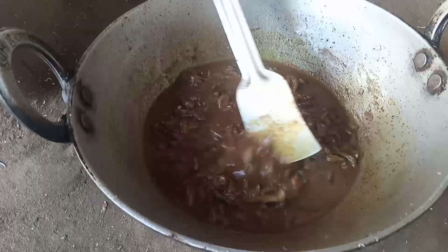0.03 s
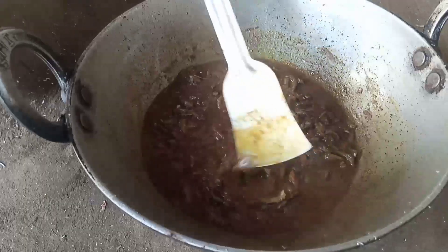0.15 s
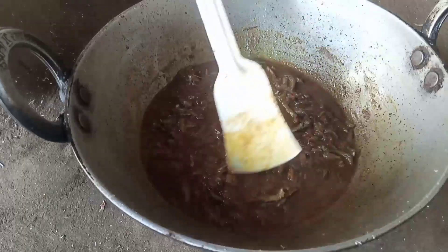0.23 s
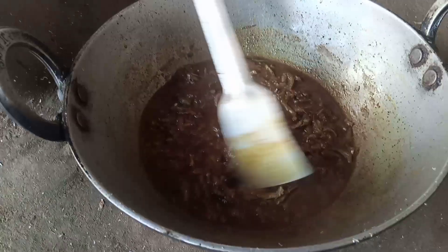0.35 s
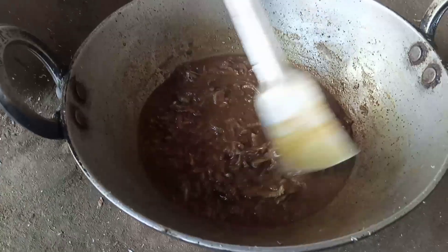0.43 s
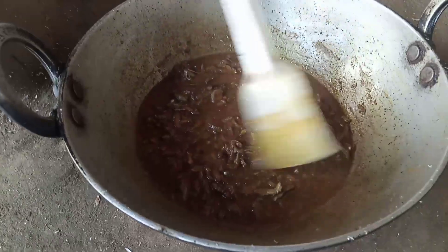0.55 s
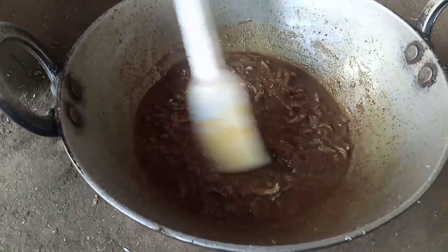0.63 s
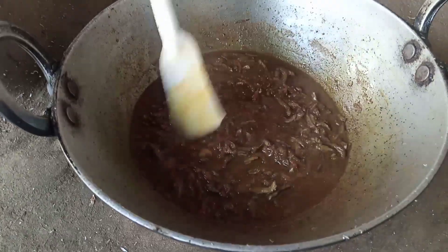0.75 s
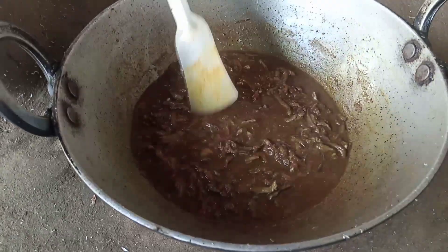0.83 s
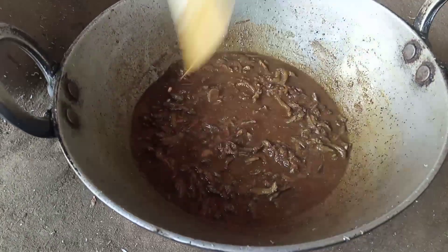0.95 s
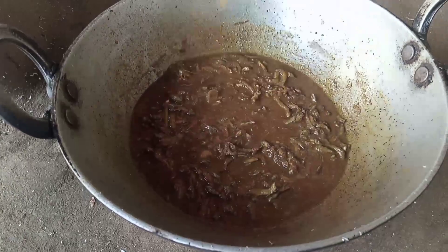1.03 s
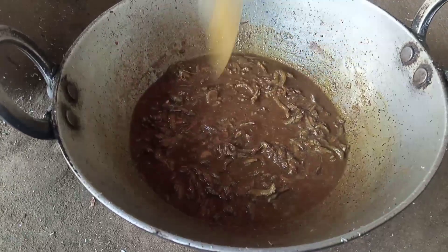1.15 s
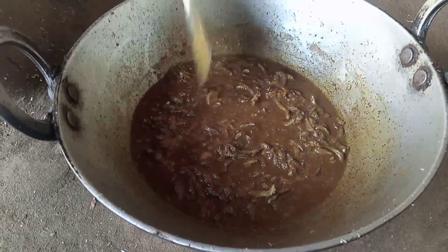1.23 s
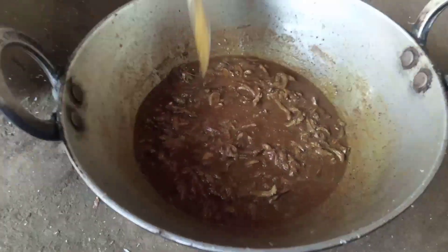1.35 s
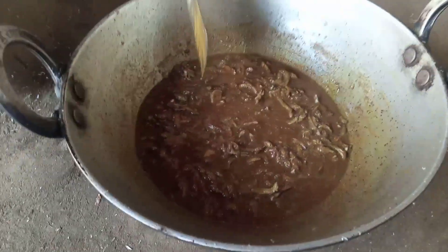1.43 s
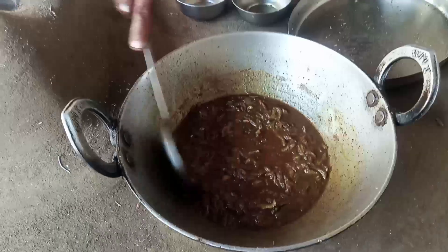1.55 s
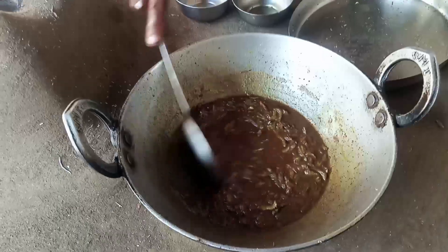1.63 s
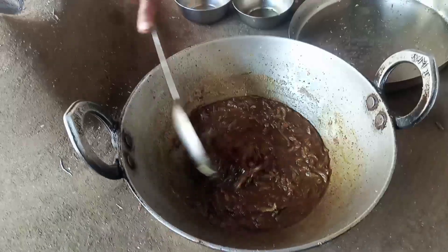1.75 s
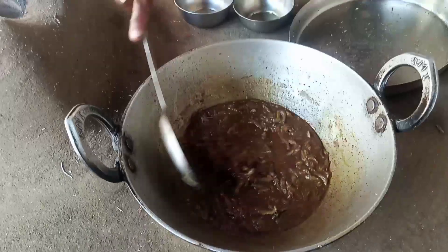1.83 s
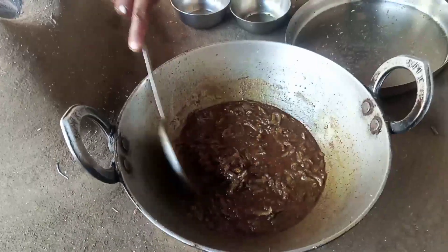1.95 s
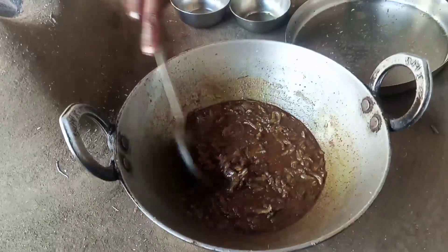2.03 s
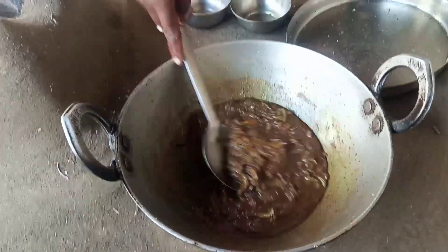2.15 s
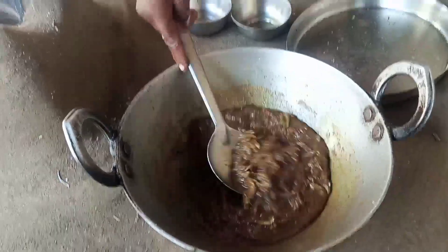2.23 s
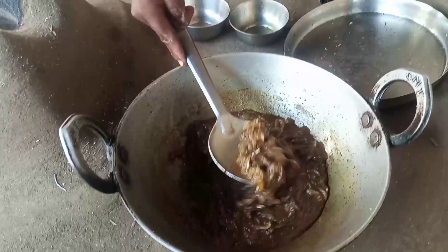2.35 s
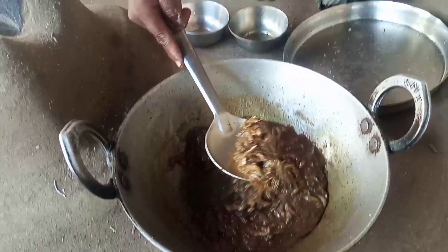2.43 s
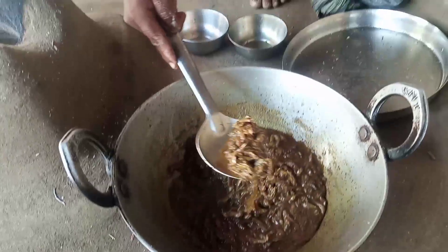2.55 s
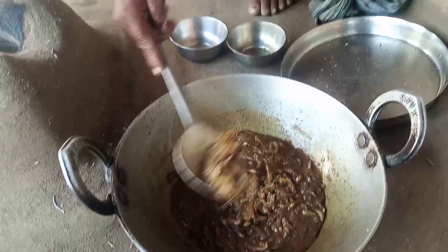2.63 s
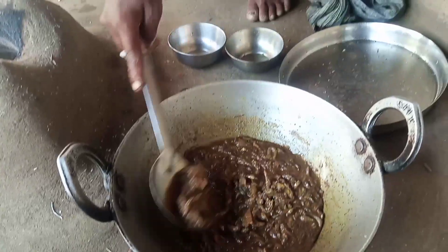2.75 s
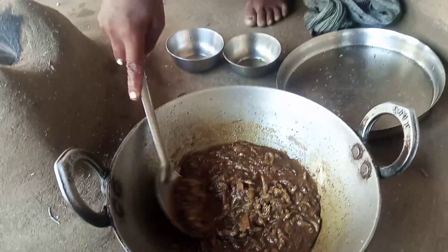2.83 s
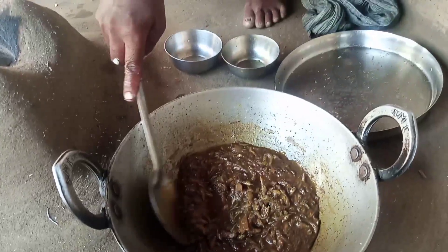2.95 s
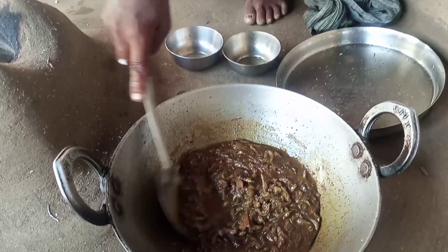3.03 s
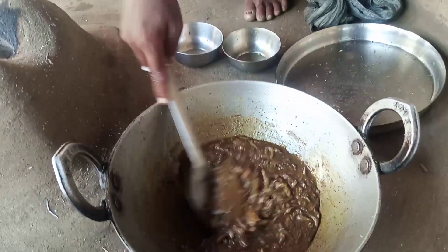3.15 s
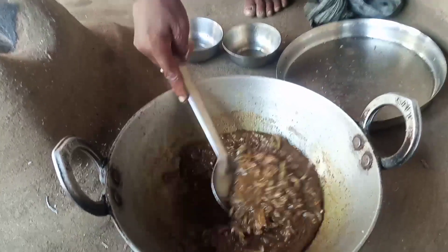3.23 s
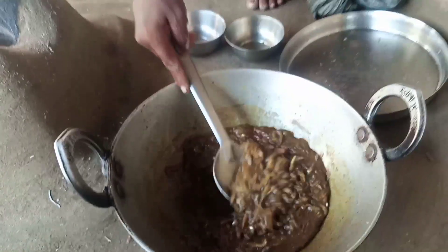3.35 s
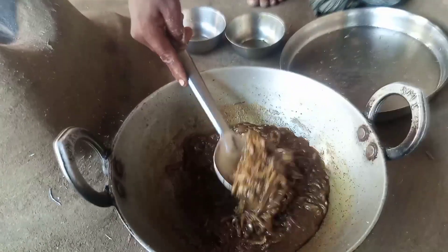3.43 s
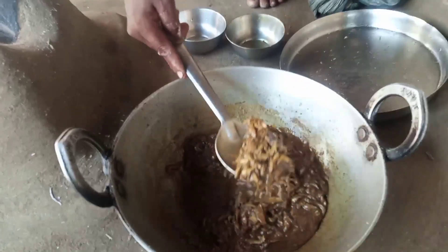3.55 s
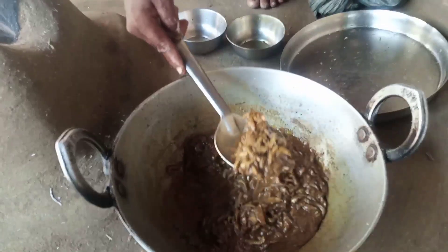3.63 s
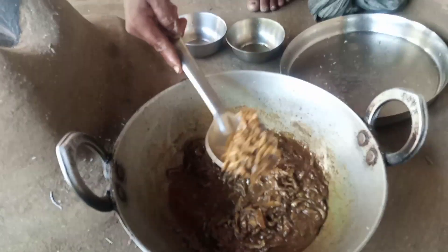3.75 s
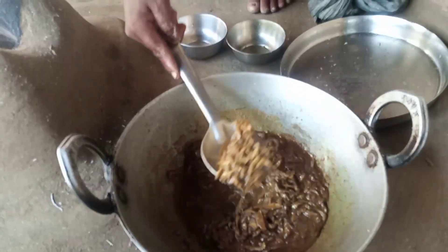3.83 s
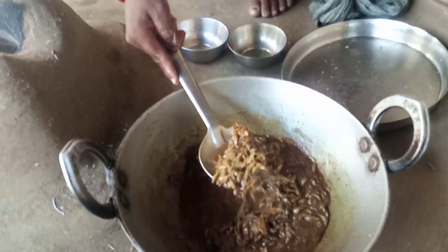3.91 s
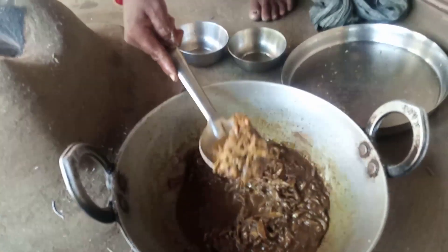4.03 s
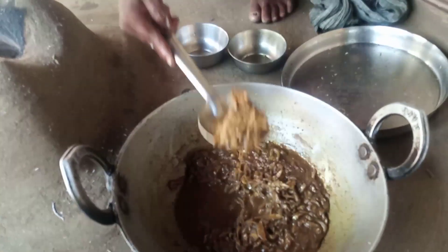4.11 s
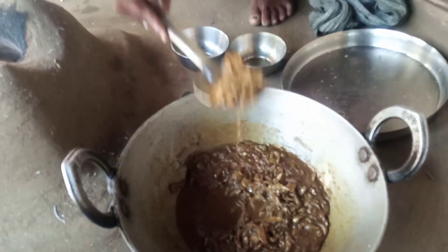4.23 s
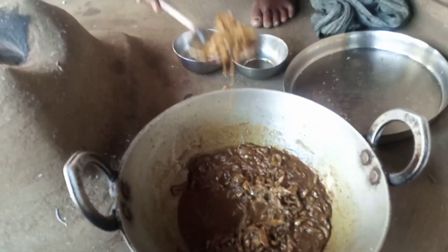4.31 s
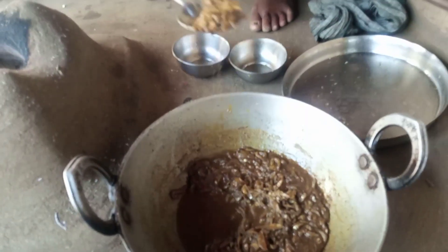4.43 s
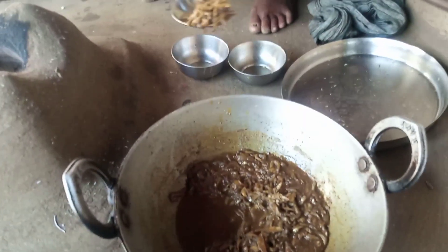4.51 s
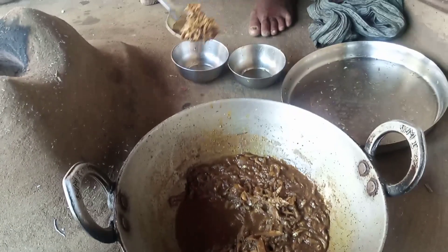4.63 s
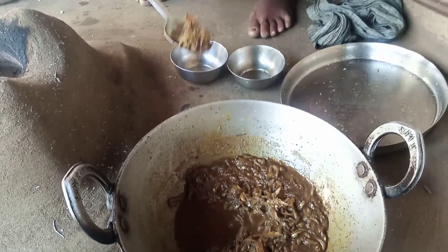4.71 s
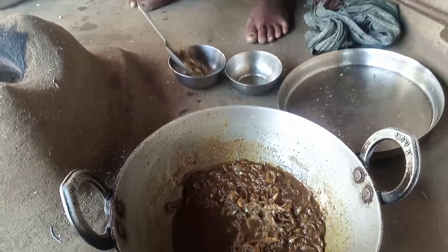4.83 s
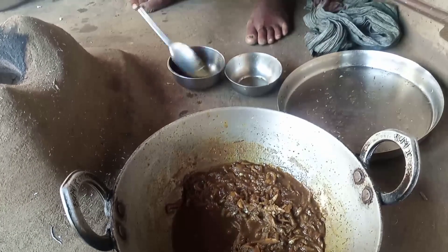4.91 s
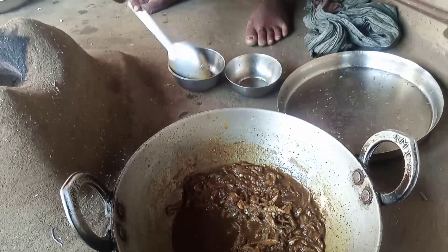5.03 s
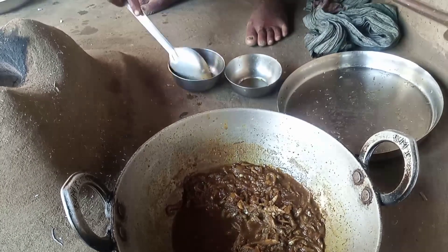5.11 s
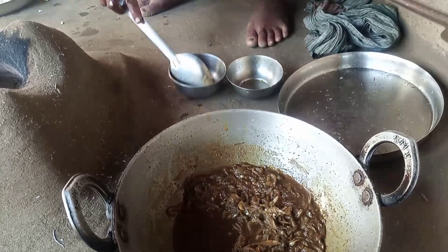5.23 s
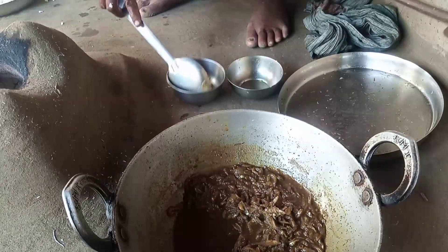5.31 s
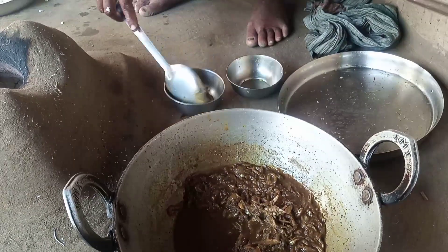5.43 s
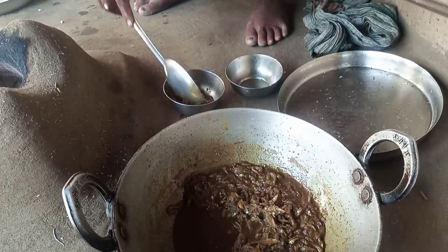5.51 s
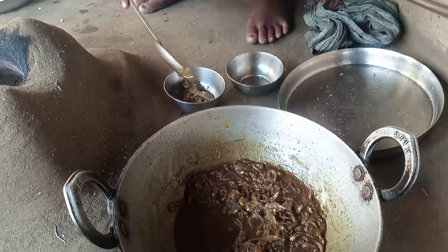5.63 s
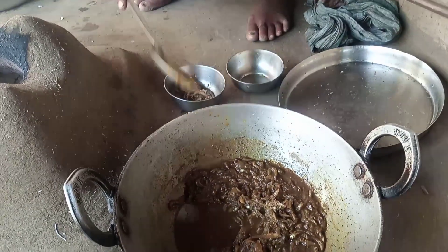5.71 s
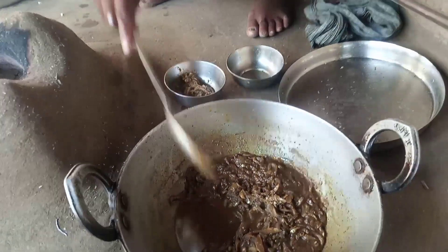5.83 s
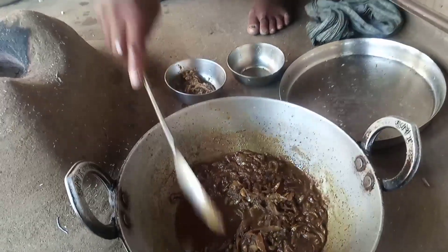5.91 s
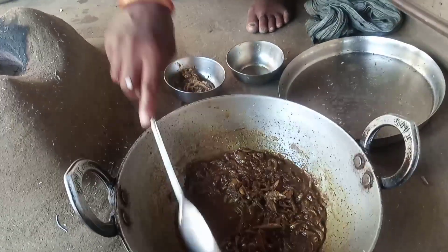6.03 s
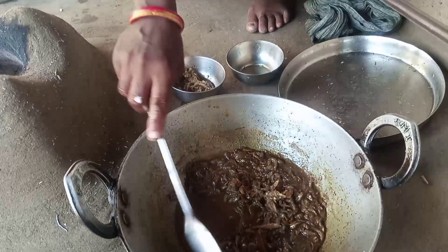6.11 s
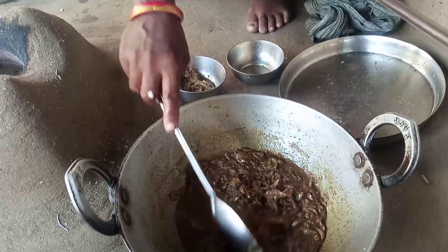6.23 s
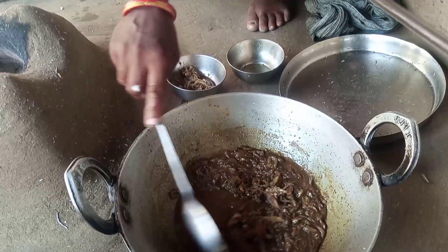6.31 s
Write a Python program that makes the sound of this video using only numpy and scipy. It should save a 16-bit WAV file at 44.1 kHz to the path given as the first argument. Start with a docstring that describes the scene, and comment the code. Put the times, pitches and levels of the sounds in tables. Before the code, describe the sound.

After a quiet insect buzz and a brief silence, hard clanks ring from a thick-walled pan, followed by spoon clinks, scrapes and a squeak in a bowl.

```python
"""A steel spoon knocks and scrapes an aluminium pan of thick food, then clinks in a small steel bowl, a step from a phone.
Blows ring banks of decaying modes under a noisy contact crack; scrapes are dense random slips heard through the modes.
Sparrows chirp as gliding sines, a far bird holds one note, and cloth rustles over a low rumble.
Two shots are joined by a short silence: insects, a noise band with wavering tones, buzz only in the first;
a spotty, noise-suppressed hiss lies under the second."""
import sys
import numpy as np
from scipy import signal
from scipy.fft import rfft, irfft
from scipy.io import wavfile
from scipy.ndimage import uniform_filter1d

SR = 44100
rng = np.random.default_rng(int(sys.argv[2]) if len(sys.argv) > 2 else 0)


def int16_out(signal):
    """Quantize to a 16-bit WAV file."""
    q = np.round(np.clip(np.atleast_2d(signal).T, -1, 1) * 32767)
    wavfile.write(sys.argv[1], SR, q.astype(np.int16))


def boost(x):
    """Linear amplitude factor 10**(x/20) for a level x in decibels (scalar or array-like)."""
    u = np.asarray(x, float) / 20
    return 10 ** u


N = 280917
TIME = np.arange(N) / SR

# silence between the two shots: start_s, end_s
GAP_S = (1.49, 1.637)
# pan wall modes: pitch_hz, width_hz (before any damping floor), level_db (per width)
PAN_MODES = [(605, 9.2, -16.5), (752.5, 100, -15), (1145, 16, -10), (1338, 86, -7), (1545, 20, -5.5),
             (1726, 180, -5.5), (2056, 63, -11.5), (2540, 250, -9), (3050, 160, -10), (3307, 270, -22.5),
             (4080, 17, -20.5), (4770, 74, -17.5), (4770, 66, -2.5), (5235, 100, -4.5), (6070, 230, -4.5),
             (6490, 90, 2), (7080, 220, -1), (7400, 200, -1), (8580, 73, -20), (9060, 210, -7.5),
             (9600, 340, -8), (10050, 130, -18), (11100, 260, -25), (11700, 540, -17), (13400, 160, -32),
             (15000, 110, -32.5), (15600, 95, -28), (15300, 290, -14.5)]
# steel bowl modes, then spoon blade modes: pitch_hz, level_db, t60_s
BOWL_MODES = [(1436, -10.5, 0.45), (1467, -13, 0.4), (2280, -19.5, 0.53), (3180, -28.5, .12),
              (4190, -13, 0.28), (5373, -16, .25), (6480, -10.5, 0.13), (7600, -17, .14), (7975, -27, .3),
              (8560, -26, 0.15), (9270, -16, .17), (9880, -0.5, 0.087), (9600, -8.5, 0.11),
              (10540, -4.5, .07), (10410, -4.5, .08), (11330, -3.5, .1), (13800, -14.5, 0.054),
              (14500, -17, .08), (15600, 3.5, .07), (15350, -7.5, .08)]
SPOON_MODES = [(2272, -43.5, 0.47), (3025, -18.5, 0.24), (4544, -13.5, 0.13), (5663, -6, 0.285),
               (6440, -9, 0.14), (7386, -5.5, 0.14), (6760, -11.5, 0.14), (7696, 2.3, 0.16),
               (8430, -14.5, 0.29), (9286, -27.5, 0.25), (9540, -5.5, 0.097), (9770, -15, 0.32),
               (9900, -1, 0.078), (9700, -9.5, 0.13), (10800, -22, 0.27), (11480, -2, 0.14),
               (13320, -25.5, 0.12), (13800, -21.5, 0.12), (14610, -6.5, 0.09), (15340, 0, 0.076)]
# noise spectrum of bare metal contact: pitch_hz, density_db (per Hz, before each blow's tilt)
CRACK_SPECTRUM = [(180, -46), (300, -18.5), (504, -32.5), (848, -9), (3650, -8), (4100, -4.5), (6340, -3),
                  (7760, -6), (13000, -15.5), (14900, -11.5), (16500, -11.5)]
# blows on pan, bowl and spoon: start_s, level_db, brightness_db (per octave), crack_db (relative share)
PAN_BLOWS = [(0.019, -42, 8.5, 8.5), (0.068, -47.5, 5, -16), (0.454, -49.5, -1, -23),
             (1.308, -38.5, -7.5, 2.5), (1.681, -36.5, 8, -16), (2.088, -10.5, -4.5, 12), (2.135, -9, 2, 0),
             (2.138, -15.5, -6, 13), (2.148, -20.5, -1.1, -3), (2.156, -11.5, 1.5, -2), (2.172, -35, -9, 7),
             (2.175, -21, -1, 10), (2.181, -24, -3.5, 1.6), (2.211, -27, -4, 0.5), (2.633, -40, -15, -11),
             (2.916, -13, -1.5, 8.5), (3.144, -36.5, 6.5, -4.5), (3.166, -43, 3, 7), (3.176, -19.5, 5, 1.5),
             (3.191, -32.5, -6, 8), (3.209, -10.5, 14, -13.5), (3.227, -20, 3.5, 12.5), (3.24, -33, 9, 3),
             (3.252, -24, 2.1, 14), (3.271, -46, -7.5, -3.5), (3.291, -36, 0, 10.5), (3.311, -42, 5, 7.5),
             (3.369, -27, -6, 1.5), (4.044, -56.5, 15, -3), (4.061, -41.5, 4.5, 10.5), (4.092, -58, -4, 12),
             (5.614, -45, -7.5, -10), (5.8, -37, 5, 9), (5.99, -50, -7, -17), (6.173, -29.5, -8, -11),
             (6.177, -30, -11, -10), (6.261, -48, 3, -8)]
BOWL_BLOWS = [(4.956, -12.5, -1, 7), (5.019, -15.5, 0, 7), (5.088, -46.5, -3.5, 13),
              (5.235, -26.5, -1, 3.5), (5.311, -30, 0.5, -17)]
SPOON_BLOWS = [(5.134, -10.5, 0, -6), (5.147, -15, 0, -0.7), (5.162, -13, 0, -7.5), (5.461, -33.5, 0, -10)]
# strokes on pan, food, bowl and cloth: firmest_s, rise_s, fall_s, level_db, brightness_db (per octave)
PAN_SCRAPES = [(2.139, 0.005, 0.033, -29, 1.5), (2.157, 0.013, 0.013, -28.5, -0.5),
               (2.18, .01, 0.033, -34, -2), (2.225, 0.071, 0.033, -40, 1), (2.27, .03, 0.085, -77.5, -1),
               (3.19, 0.052, .03, -57, 7), (3.222, 0.022, 0.035, -38.5, 2), (3.27, 0.027, .04, -48, -4),
               (3.31, 0.024, 0.045, -60.5, 1), (6.195, .025, 0.028, -59, 3.5),
               (6.212, 0.018, 0.011, -60, 6), (6.225, .015, 0.036, -64, 4), (6.28, 0.041, 0.13, -66.5, -1)]
FOOD_STIRS = [(.59, .03, .06, -64, 3), (.69, .02, 0.042, -71, 1.5), (1.664, 0.024, 0.055, -65.5, 1.5),
              (2.39, .02, 0.049, -83, 5.5), (2.46, 0.048, 0.077, -61.5, -9), (2.52, 0.1, 0.11, -60, -16),
              (2.635, 0.026, 0.051, -68.5, -20), (2.86, 0.019, 0.09, -70.5, -9)]
BOWL_SCRAPES = [(5.137, 0.0032, 0.055, -41, 6), (5.2, 0.032, 0.067, -54, -7),
                (5.255, 0.038, 0.051, -48.5, -1), (5.311, .02, 0.074, -50, 0.5), (5.4, .06, .06, -68, 6),
                (5.47, 0.026, 0.054, -57, 3.5), (5.51, 0.082, 0.092, -52.5, 3.5),
                (5.62, 0.043, 0.093, -61.5, -8.5), (5.805, 0.041, 0.058, -56.5, -1)]
CLOTH_RUSTLES = [(0.03, 0.039, .06, -81, 8.5), (0.075, .012, 0.094, -83, 6.5),
                 (1.13, 0.047, 0.13, -75, 5.5), (1.316, 0.016, 0.019, -70.5, -12),
                 (1.47, 0.21, 0.19, -57, 5.5), (4.29, .02, 0.07, -69.5, -15), (4.355, 0.031, 0.15, -64, -3),
                 (4.6, 0.16, 0.35, -77, -1), (4.85, 0.25, 0.15, -72.5, 1), (4.94, 0.047, 0.043, -71, 0.5),
                 (5.04, .004, 0.022, -52.5, 3), (5.114, 0.0483, 0.026, -59, -1),
                 (5.95, 0.14, 0.14, -77.5, 1.5), (6.05, 0.088, 0.065, -77, -1.5),
                 (6.16, 0.062, 0.032, -74, 2)]
# colour of each rubbing against its middle band: body_db, edge_db, treble_db
PAN_GRAIN_DB = (-5, -2.5, -13.5)
FOOD_GRAIN_DB = (-16.5, -6.5, -8)
BOWL_GRAIN_DB = (-14, -0.5, 1.5)
CLOTH_GRAIN_DB = (-7.5, -3.5, -6)
# hollow resonances of the pan and bowl, which colour the rustle: pitch_hz, level_db, t60_s
HOLLOW_MODES = [(544, 13, 0.13), (821, -4, 0.5), (1116, -6.5, 0.13), (1329, 6, 0.062), (1974, 1, 0.018)]
# wet food ticking on the blade: peak_s, level_db, pitch_hz
FOOD_TICKS = [(2.361, -69.5, 7180), (2.3924, -69.5, 9450), (2.4325, -56, 9500), (2.4718, -62, 9220),
              (2.531, -60, 8200), (2.8696, -78, 6820), (3.5242, -59.5, 7680), (3.6177, -57, 11100),
              (3.636, -65.5, 6850), (3.918, -65.5, 10170), (4.2043, -56, 9780), (4.344, -56.5, 8900),
              (4.47, -63, 10380), (4.497, -65.5, 10400), (4.537, -63.5, 8340), (6.33, -58.5, 8520)]
# throbs of the blade squeaking on the rim: peak_s, level_db, stick_slip_hz
SQUEAK_THROBS = [(5.235, -40.5, 962), (5.245, -38, 920), (5.253, -37, 928), (5.263, -41, 948),
                 (5.269, -47, 890), (5.318, -50.5, 926)]
# squeak harmonics from the fundamental up: level_db
SQUEAK_HARMONICS_DB = [-40, 3.5, -11, -1.5, 0.5, -6, -7.5]
# sparrow notes, before waver and roughness: start_s, length_s, from_hz, to_hz, level_db (before a common lift)
CHIRPS = [(.27, .06, 4970, 4960, -85), (0.881, 0.036, 3350, 2680, -76), (1.192, 0.053, 3240, 2520, -71.5),
          (1.722, 0.072, 5030, 3200, -63), (1.786, 0.066, 3630, 2445, -47), (1.756, 0.099, 5200, 4660, -60),
          (1.848, 0.029, 4700, 3320, -65), (1.842, 0.045, 3600, 2960, -54), (1.755, 0.068, 4800, 4100, -67),
          (2.419, 0.061, 5240, 4820, -62.5), (2.472, 0.073, 5350, 3695, -65),
          (2.48, 0.047, 4840, 3500, -60.5), (2.495, 0.039, 3440, 2564, -57),
          (3.35, 0.06, 4730, 3860, -63.5), (3.401, 0.066, 3347, 2870, -61), (3.428, 0.038, 4700, 4260, -69),
          (3.646, 0.079, 4806, 3690, -64.5), (3.704, 0.03, 3304, 2920, -74.5),
          (3.741, 0.049, 3246, 2635, -56), (3.784, 0.12, 5200, 4580, -64.5),
          (3.876, 0.037, 4640, 4220, -69), (3.905, 0.035, 3620, 3100, -57.5),
          (4.115, 0.034, 2380, 3310, -60), (4.125, 0.04, 4190, 4580, -66), (4.165, 0.021, 3010, 2860, -71),
          (4.17, 0.048, 5480, 5360, -73.5), (4.21, 0.098, 4860, 4355, -61),
          (4.307, 0.025, 3520, 2980, -57.5), (4.387, 0.018, 3050, 2800, -54),
          (4.742, 0.023, 3246, 2890, -59.5), (4.82, 0.14, 5510, 4350, -70),
          (5.629, 0.042, 3654, 2940, -56.5), (5.683, 0.075, 4290, 2680, -64.5),
          (5.855, 0.074, 4980, 3870, -66), (5.924, 0.035, 3100, 2870, -65.5)]
# swells of the far held note: peak_s, rise_s, fall_s, level_db
HELD_NOTE = [(1.88, 0.049, 0.21, -56.5), (2.06, .1, 0.044, -65.5), (2.35, .15, 0.16, -80),
             (3.31, .1, .1, -53), (3.46, .12, 0.053, -55.5), (3.62, .15, .15, -81),
             (4.63, 0.21, 0.074, -71), (4.76, .07, .13, -72), (5.93, 0.42, .35, -70)]
HELD_NOTE_HZ = 1362.
# one swell of a low hum: peak_s, rise_s, fall_s, level_db
HUM_SWELL = [(2.72, 0.059, 0.15, -58)]
HUM_HZ = 178.2
# insect chorus spectrum: pitch_hz, density_db (per Hz); and its level_db before trim
INSECT_BAND = [(3240, -32), (5500, -35), (6030, -17), (6300, -26), (6830, 0.5), (8100, -2), (8390, 2.5),
               (8930, -2), (9100, -5.5), (10500, -21.5), (13600, -62), (22000, -120)]
INSECT_BAND_DB = -62
# single insects: pitch_hz (before waver), level_db (before a common lift)
INSECT_TONES = [(6234, -88), (6880, -94.5), (7025, -77.5), (7450, -85), (7655, -78.5), (8662, -69)]
# steady faint floor of the first shot: pitch_hz, density_db (per Hz); and its level_db
STEADY_FLOOR = [(15, -36), (25, 13.5), (49, -10), (118, -10), (669, -22.5), (5570, -27.5), (6920, -19.5),
                (8370, -7), (10400, -30.5), (15200, -28), (16500, -63)]
STEADY_FLOOR_DB = -72.5
# noise-suppressed hiss of the second shot, before it turns spotty: pitch_hz, density_db (per Hz); and its level_db
SPOTTY_HISS = [(350, -29.5), (500, 0.5), (620, -11), (1100, -17.5), (1410, -6.5), (3400, -22.5),
               (4620, -15.5), (6660, -24), (9500, -21.5), (13000, -29.5), (14300, -22), (15400, -13.5),
               (16500, -31)]
SPOTTY_HISS_DB = -77.5
# low rumble of street and hand: pitch_hz, density_db (per Hz)
RUMBLE_SPECTRUM = [(12, -61), (20, -34), (27, -37), (64, 0), (170, -5), (216, -2), (416, -7.5), (497, -5.5),
                   (700, -42.5), (910, -50.5), (1540, -120)]
# mean rumble level: before_gap_db, after_gap_db
RUMBLE_DB = (-94.5, -73.5)
# the hand shifts on the phone and the pan rocks on the ground: peak_s, rise_s, fall_s, level_db
BUMPS = [(.29, 0.13, 0.4, -87.5), (.99, 0.054, 0.092, -82), (1.116, .04, 0.14, -73),
         (1.31, 0.037, 0.13, -63.5), (1.48, 0.28, .05, -66), (2.1, 0.037, 0.038, -53.5),
         (2.2, .08, 0.085, -57), (2.68, .1, 0.18, -66), (2.93, 0.027, 0.052, -65.5),
         (4.37, 0.092, 0.13, -66), (5.1, 0.62, 0.31, -62.5), (5.45, 0.086, 0.12, -68),
         (5.62, 0.037, 0.066, -50), (5.803, 0.032, 0.057, -47), (6.0, 0.086, 0.048, -59),
         (6.178, 0.0073, 0.13, -54.5)]
# microphone colour: pitch_hz, gain_db
MICROPHONE = [(250, -1.6), (400, -6.5), (750, 0), (6400, -1.5), (10500, 0.9), (13000, -7), (15000, 1)]
# upper edge of the microphone's range
TOP_HZ = 15750


def unit(x):
    """Scale to rms 1."""
    return x / np.sqrt(np.mean(x ** 2))


def noise():
    """White noise as long as the scene."""
    return rng.standard_normal(N)


def colour(x, points):
    """Shape the spectrum by (Hz, dB) points, joined along log frequency."""
    hz, db = np.transpose(points)
    f = np.maximum(np.arange(len(x) // 2 + 1) * SR / len(x), 1)
    gain = boost(np.interp(np.log(f), np.log(hz), db))
    return irfft(rfft(x) * gain, len(x))


def walk(rate):
    """Random levels held 1 / rate s and smoothed twice."""
    hold = int(SR / rate)
    steps = np.repeat(rng.standard_normal(N // hold + 1), hold)
    return 1.1 * uniform_filter1d(uniform_filter1d(steps, hold), hold)[:N]


def add(out, s, x):
    """Mix x in at s seconds."""
    i = int(s * SR)
    out[i:i + len(x)] += x[:N - i]


def swells(rows, bend, octaves=0):
    """Summed gain of swells that lie 20 dB down one rise before and one fall after their peak."""
    t, out = TIME[::32], 0
    for s, rise, fall, db, *brightness in rows:
        away = np.maximum((s - t) / max(rise, .001), (t - s) / max(fall, .001))
        out = out + boost(db + octaves * sum(brightness) - 20 * away ** bend)
    return np.interp(TIME, t, out)


def patchy(x, spread_db, frames, bins):
    """A spectrum that comes and goes: a random gain map, smooth over some frames and frequency bins."""
    spectrum = signal.stft(x, nperseg=512)[2]
    chance = rng.standard_normal(spectrum.shape)
    chance = uniform_filter1d(uniform_filter1d(chance, size=bins, axis=0), size=frames, axis=1)
    shaped = spectrum * boost(spread_db * unit(chance))
    return unit(signal.istft(shaped, nperseg=512)[1][:N])


def insects():
    """A chorus band with a few singers standing out as wavering tones."""
    band = unit(colour(noise(), INSECT_BAND)) * boost(INSECT_BAND_DB - 2 + walk(17))
    tones = 0
    for hz, db in INSECT_TONES:
        level = boost(db + 5.5 + 3.6 * walk(25))
        tones = tones + level * np.sin(2 * np.pi * hz * TIME + 1.8 * walk(11))
    return band + tones


def yard():
    """A faint steady floor with insects, then a spotty, noise-suppressed hiss; flickering rumble and a hum swell."""
    before = TIME < GAP_S[0]
    first = boost(STEADY_FLOOR_DB) * unit(colour(noise(), STEADY_FLOOR)) + insects()
    second = boost(SPOTTY_HISS_DB) * patchy(colour(noise(), SPOTTY_HISS), 4.5, frames=6, bins=8)
    handling = boost(np.where(before, *RUMBLE_DB) + 4.5 * walk(19)) + swells(BUMPS, 1.1)
    rumble = unit(colour(noise(), RUMBLE_SPECTRUM)) * handling
    hum = swells(HUM_SWELL, 1.3) * np.sin(2 * np.pi * HUM_HZ * TIME)
    return np.where(before, first, second) + rumble + hum


def birds():
    """Mostly falling, rough chirps that waver in pitch, smeared by the yard walls, and one held note."""
    echo_db, echo_t60, rough_db = -.5, .17, 4.5
    chirps = np.zeros(N)
    wobble = 1 + .008 * walk(60) + .016 * walk(500)
    for s, length, from_hz, to_hz, db in CHIRPS:
        u = np.linspace(0, 1, int(length * SR))
        hz = (from_hz + (to_hz - from_hz) * u) * wobble[int(s * SR):][:len(u)]
        tone = np.sin(2 * np.pi * np.cumsum(hz) / SR)
        add(chirps, s, boost(db + 1) * np.sin(np.pi * u) ** 0.27 * tone)
    chirps = chirps * boost(rough_db * walk(200))
    t = TIME[:SR // 2]
    walls = rng.standard_normal(len(t)) * boost(-60 * t / echo_t60)
    echo = signal.fftconvolve(chirps, walls / np.linalg.norm(walls))[:N]
    phase = 2 * np.pi * HELD_NOTE_HZ * TIME
    note = np.sin(phase) + boost(-25.5) * np.sin(2 * phase)
    held = boost(1.2 * walk(30)) * swells(HELD_NOTE, 1.1) * note
    return chirps + boost(echo_db) * echo + held


def ring(modes, tilt_db=0, scatter_db=0):
    """Impulse response of a set of modes; each blow lands elsewhere and weighs them anew."""
    hz, db, t60 = np.transpose(modes)[:, :, None]
    t = TIME[:SR // 2]
    db = db + tilt_db * np.log2(hz / 3000) + scatter_db * rng.standard_normal(hz.shape)
    decay = boost(db - 60 * t / np.maximum(t60, .005))
    return unit(np.sum(decay * np.sin(2 * np.pi * hz * t), axis=0))


def scrape(strokes, grain_db, bend, modes, ring_db, grit_db, slip_db):
    """Dense slips of uneven size, in uneven runs, heard bare and through the modes; all bands follow the pressure."""
    slips = noise() * boost(grit_db * rng.exponential(size=N) + slip_db * walk(150))
    rung = signal.fftconvolve(slips, ring(modes))[:N]
    sound = unit(slips) + boost(ring_db) * unit(rung)
    sound = patchy(sound, 3.6, frames=7, bins=5)  # the contact moves, so its resonances shift

    def band(lo, hi):
        """One level-matched band of the rubbing, with soft edges."""
        return unit(colour(sound, [(lo / 2, -60), (lo * .85, -18), (lo * 1.15, 0),
                                   (hi * .85, 0), (hi * 1.15, -18), (hi * 2, -60)]))

    # brightness lifts the upper bands by their octaves and lowers the body band only partly
    body_db, edge_db, treble_db = grain_db
    body = boost(body_db) * swells(strokes, bend, -0.44) * band(560, 1300)
    middle = swells(strokes, bend) * band(1300, 3800)
    edge = boost(edge_db) * swells(strokes, bend, 1.3) * band(3800, 8000)
    treble = boost(treble_db) * swells(strokes, bend, 2.4) * band(8000, 16500)
    return body + middle + edge + treble


def blows(table, modes, scatter_db, chatter_ms, thud_db, thud_hz, thud_t60, wash_db, wash_t60):
    """A short chatter of contact rings the modes; crack and wash ride on it; duller blows thud more on the ground."""
    out, t = np.zeros(N), TIME[:SR // 2]
    flutter_db = 2.5
    thin = signal.butter(3, 700, "high", fs=SR, output="sos")  # the crack carries no bass below about 700 Hz
    for s, db, tilt_db, crack_db in table:
        grains, hiss = rng.standard_normal((2, len(t)))
        chatter = grains * np.abs(grains) * np.exp(-t * 1000 / chatter_ms)
        chatter[0] = 4  # a firm first touch
        rung = signal.fftconvolve(chatter, ring(modes, tilt_db, scatter_db))[:len(t)]
        flutter = np.roll(walk(150), -int(s * SR))[:len(t)]
        rung = rung * boost(flutter_db * flutter)  # loose contact shakes the ring
        wash = boost(wash_db - 60 * t / wash_t60) * hiss  # the many weak modes, too dense to tell apart
        tilted = [(hz, d + tilt_db * np.log2(hz / 3000)) for hz, d in CRACK_SPECTRUM]
        crack = signal.sosfilt(thin, colour(chatter + wash, tilted))
        thud = np.cos(2 * np.pi * thud_hz * t) * np.minimum(t / .001, 1)
        thud = thud * boost(thud_db - 1.6 * tilt_db - 60 * t / thud_t60)
        blow = .5 * rung / np.abs(rung).max() + .5 * boost(crack_db) * crack / np.abs(crack).max() + thud
        add(out, s, boost(db) * blow[:-SR // 10])
    return out


def cloth():
    """Cloth rubs in soft swells, coloured by the hollow resonances of the pan and bowl."""
    return scrape(CLOTH_RUSTLES, CLOTH_GRAIN_DB, 1.79, HOLLOW_MODES, ring_db=-2.5, grit_db=.6, slip_db=1.2)


def squeak():
    """The blade squeaks on the rim: each throb is a few ms of regular, harmonic stick-slip."""
    out, t = np.zeros(N), TIME[:SR // 50]
    for s, db, hz in SQUEAK_THROBS:
        tone = 0
        for order, order_db in enumerate(SQUEAK_HARMONICS_DB, 1):
            tone = tone + boost(order_db) * np.sin(2 * np.pi * hz * order * t + 6 * rng.random())
        add(out, s - .002, boost(db) * tone * (t / 0.0019) * np.exp(1 - t / 0.0021))
    return out


def steel():
    """Bowl and spoon blade ring under blows; sliding between them excites both sets of modes."""
    bowl = blows(BOWL_BLOWS, BOWL_MODES, scatter_db=1.2, chatter_ms=3.4, thud_db=-38.5, thud_hz=230,
                 thud_t60=0.035, wash_db=-21.5, wash_t60=0.15)
    spoon = blows(SPOON_BLOWS, SPOON_MODES, scatter_db=1.5, chatter_ms=3.7, thud_db=-52, thud_hz=230,
                  thud_t60=0.029, wash_db=-7, wash_t60=.1)
    sliding = scrape(BOWL_SCRAPES, BOWL_GRAIN_DB, 1.09, BOWL_MODES + SPOON_MODES,
                     ring_db=-7, grit_db=2.5, slip_db=1.3)
    return bowl + spoon + sliding + squeak()


def pan_modes(least_width_hz):
    """A mode's decay follows from its width; food on the wall widens the narrow ones."""
    modes = []
    for hz, width, db in PAN_MODES:
        t60 = np.log(1000) / (np.pi * max(width, least_width_hz))
        modes.append((hz, db + 10 * np.log10(width), t60))
    return modes


def ticks():
    """Tiny bright bursts of wet food, each round its own pitch."""
    width, decay_ms = 0.13, 1.6
    out, t = np.zeros(N), TIME[:SR // 40]
    for s, db, hz in FOOD_TICKS:
        burst = rng.standard_normal(len(t)) * np.exp(-np.abs(t - .004) * 1000 / decay_ms)
        burst = colour(burst, [(hz * (1 - 2 * width), -25), (hz * (1 - width / 2), 0),
                               (hz * (1 + width / 2), 0), (hz * (1 + 2 * width), -20)])
        add(out, s - .004, boost(db) * burst / np.abs(burst).max())
    return out


def food():
    """Stirring rubs softly through the damped pan, with wet ticks on the blade."""
    stirs = scrape(FOOD_STIRS, FOOD_GRAIN_DB, 1.7, pan_modes(70), ring_db=-7, grit_db=0.36, slip_db=1.1)
    return stirs + ticks()


def pan():
    """The spoon knocks the food-damped wall and scrapes it, where the modes ring more freely."""
    knocks = blows(PAN_BLOWS, pan_modes(70), scatter_db=4, chatter_ms=3.1, thud_db=-34.5, thud_hz=235,
                   thud_t60=0.03, wash_db=-18, wash_t60=.1)
    return knocks + scrape(PAN_SCRAPES, PAN_GRAIN_DB, 1.6, pan_modes(30), ring_db=6.5, grit_db=2, slip_db=3)


def scene():
    """Yard, birds, cloth and cookware."""
    return (yard() + birds() + cloth() + steel() + food() + pan())[None]


def band_limit(x):
    """A steep low-pass at the top of the band."""
    return signal.sosfilt(signal.butter(12, 16820, fs=SR, output="sos"), x)


def record(dry):
    """The phone colours the sound and cuts the bass and the top; the gap between the shots is muted."""
    coloured = colour(dry[0], MICROPHONE)
    heard = colour(coloured, [(10, -30), (60, -3), (120, 0), (TOP_HZ - 150, 0), (TOP_HZ, -22),
                              (16700, -24), (16900, -80)])
    # fades out over 2.4 ms and back in four times slower
    outside_s = np.maximum(GAP_S[0] - TIME, (TIME - GAP_S[1]) / 4)
    sounding = np.clip(outside_s / 0.0024, 0, 1)
    return band_limit((heard * sounding)[None])


dry = scene()
out = record(dry)
int16_out(out)
```